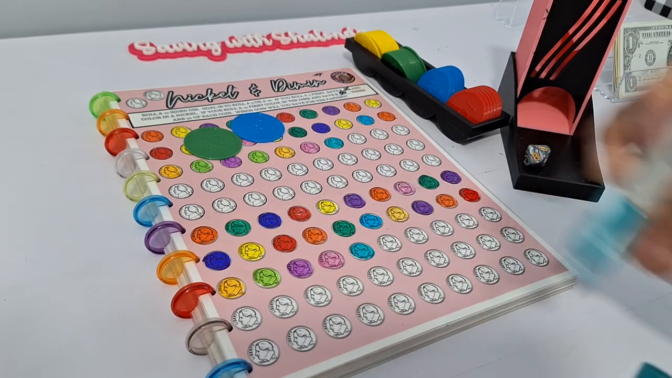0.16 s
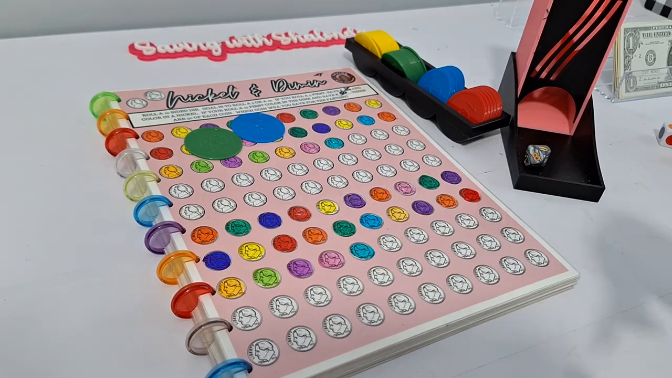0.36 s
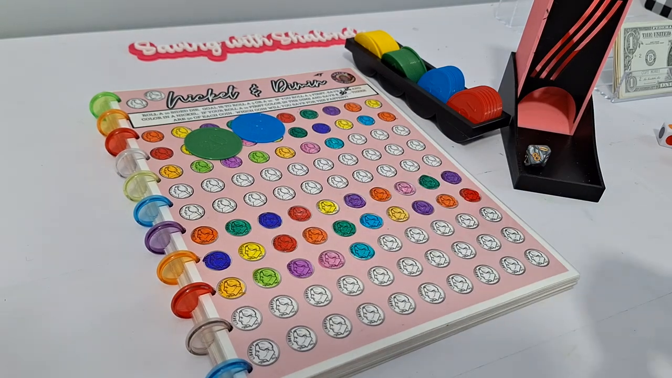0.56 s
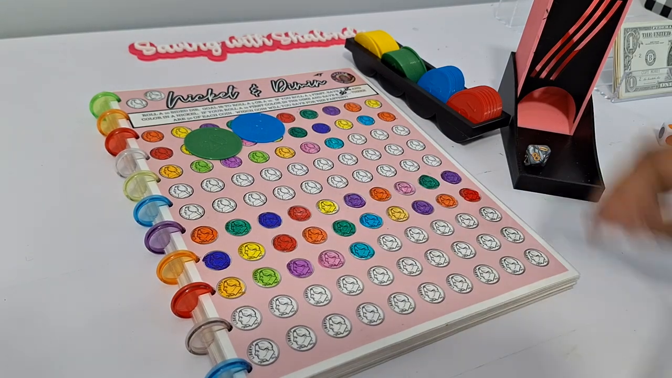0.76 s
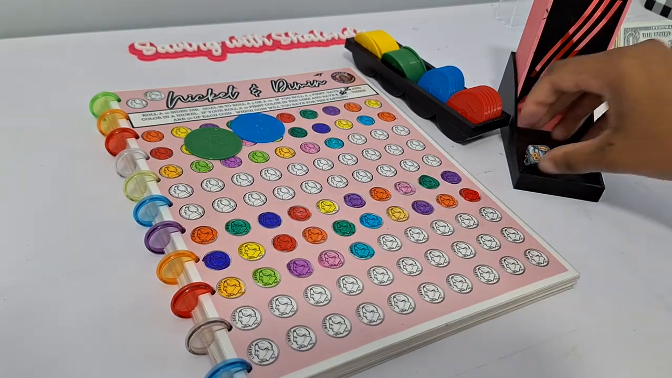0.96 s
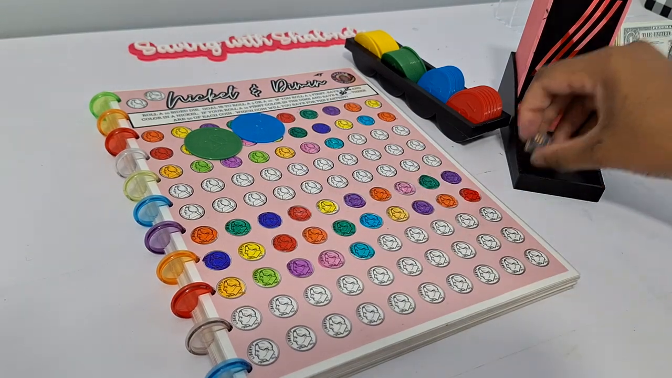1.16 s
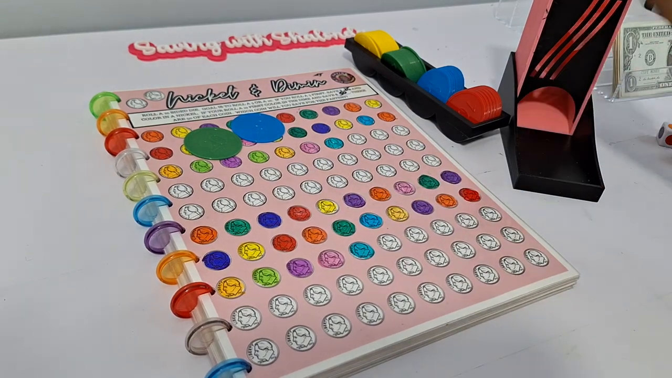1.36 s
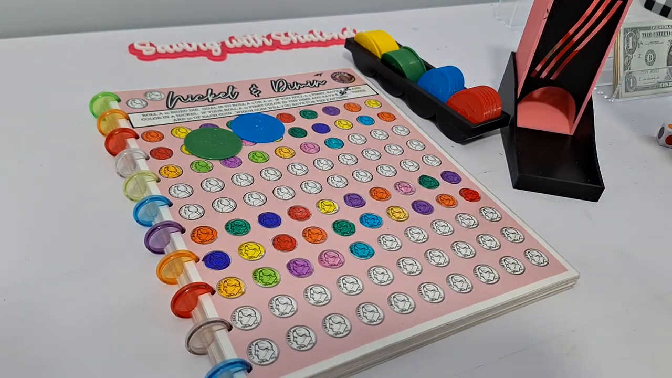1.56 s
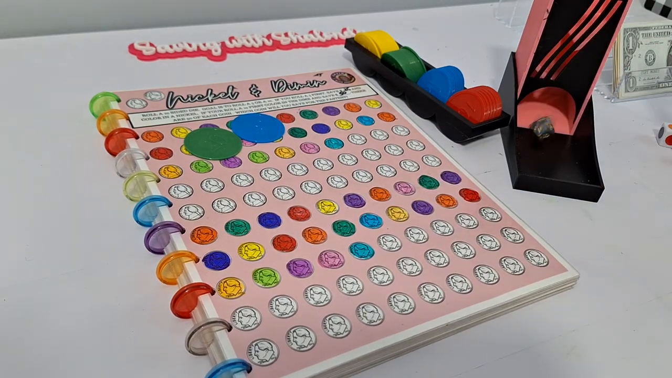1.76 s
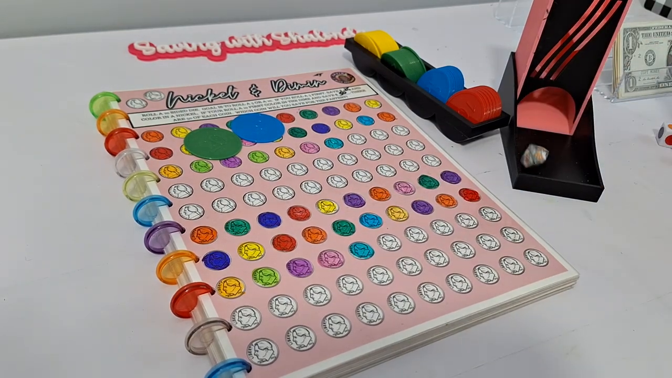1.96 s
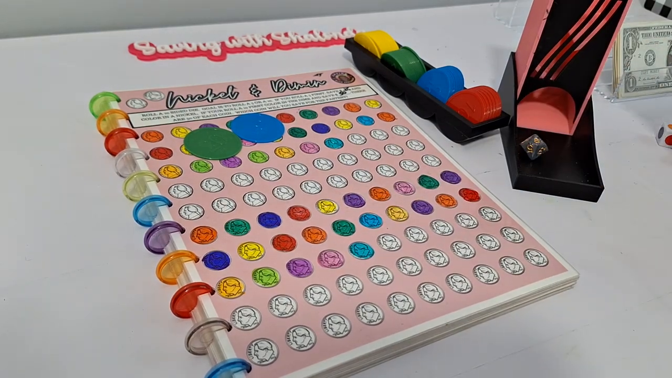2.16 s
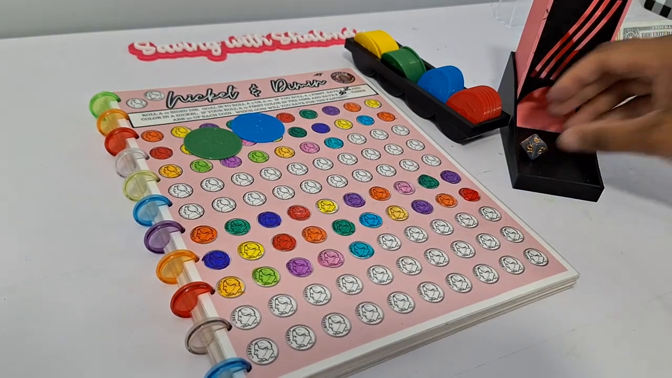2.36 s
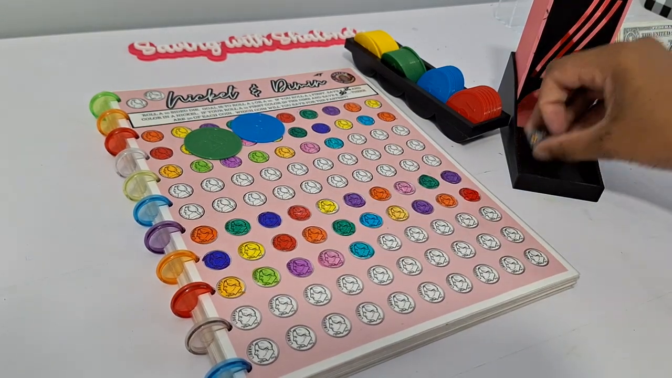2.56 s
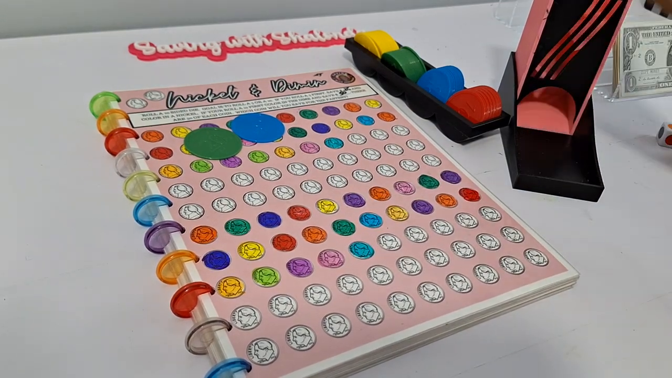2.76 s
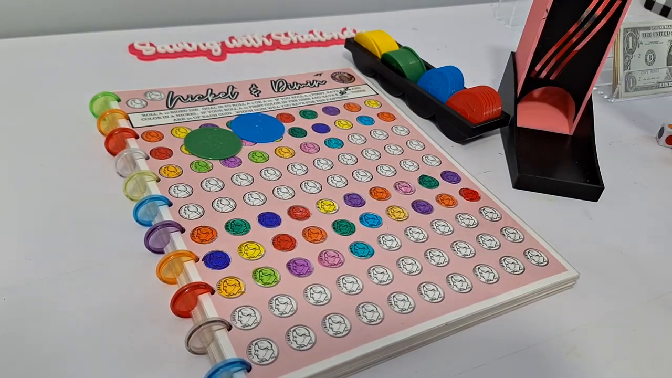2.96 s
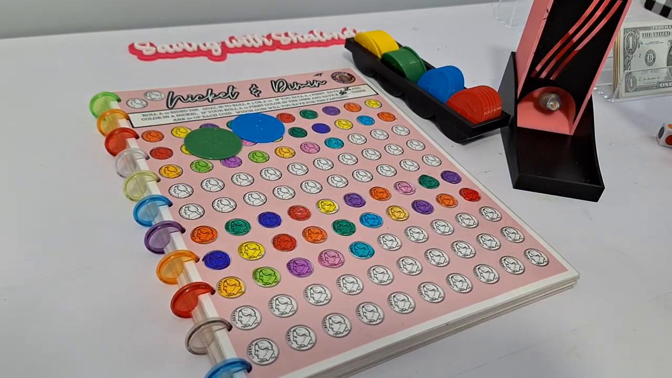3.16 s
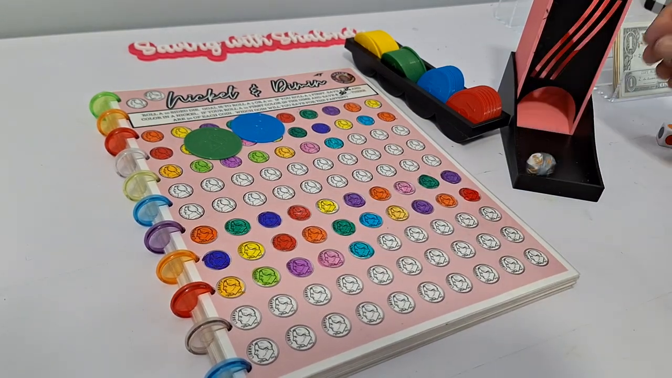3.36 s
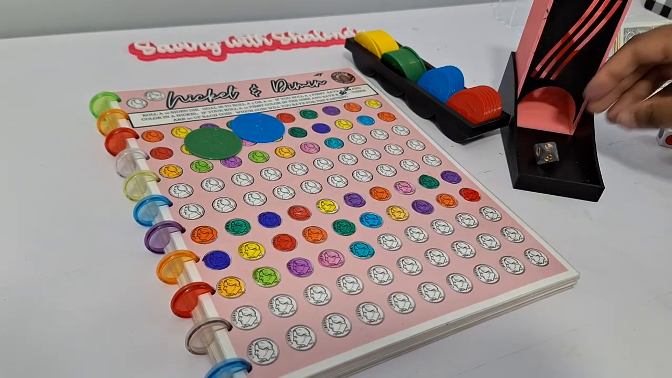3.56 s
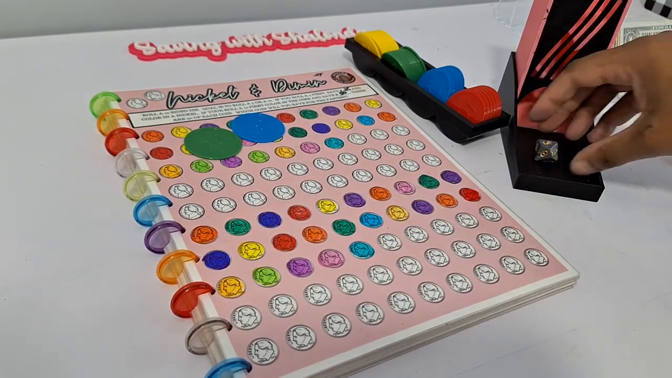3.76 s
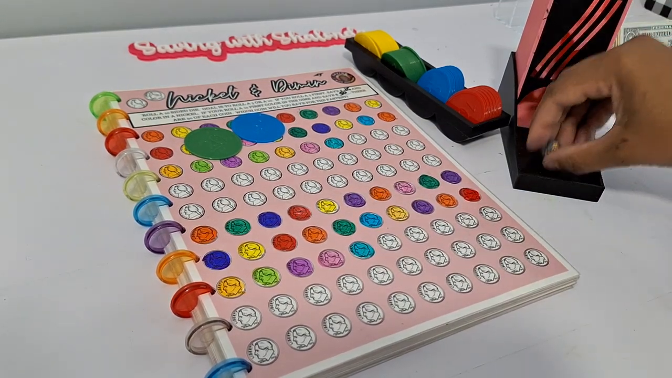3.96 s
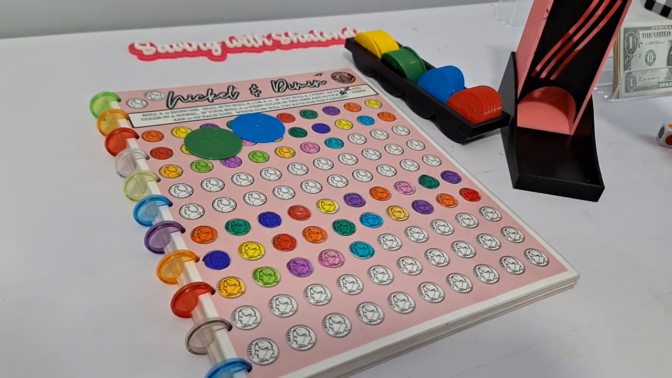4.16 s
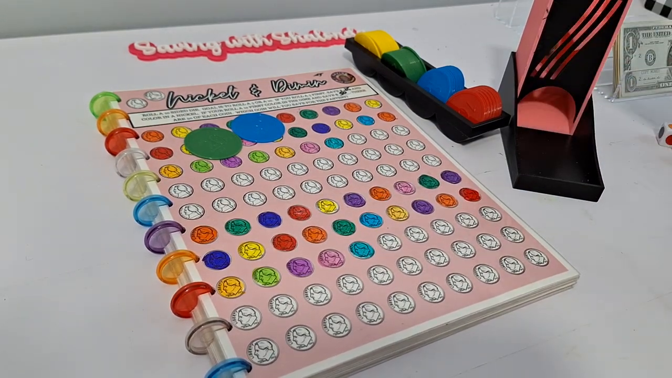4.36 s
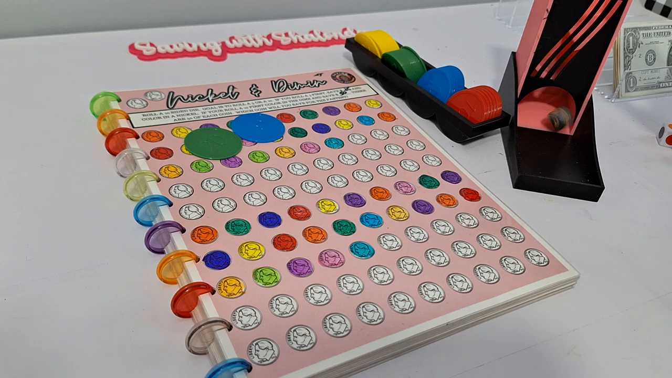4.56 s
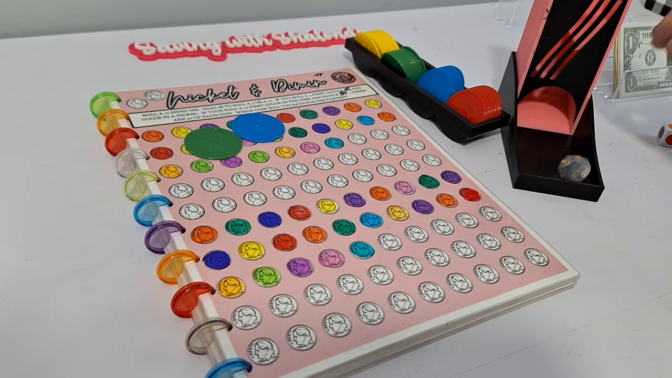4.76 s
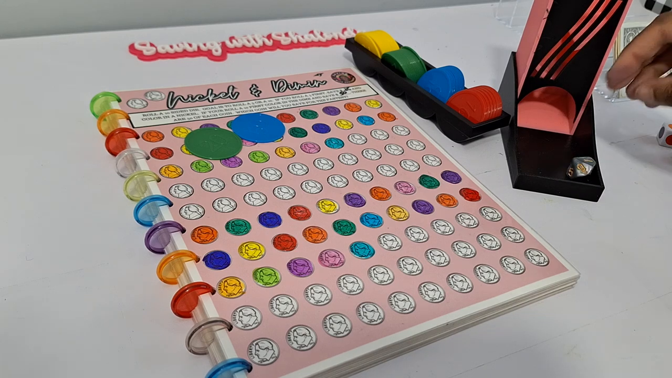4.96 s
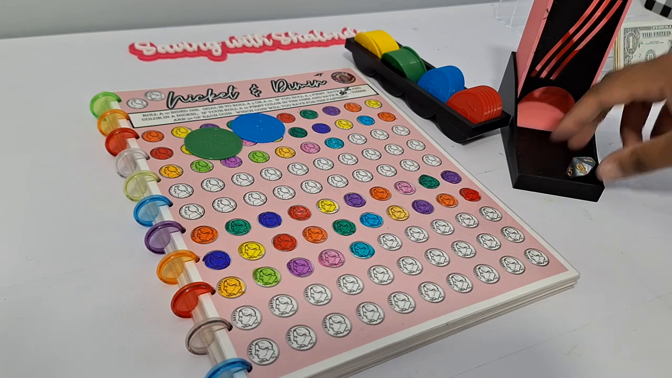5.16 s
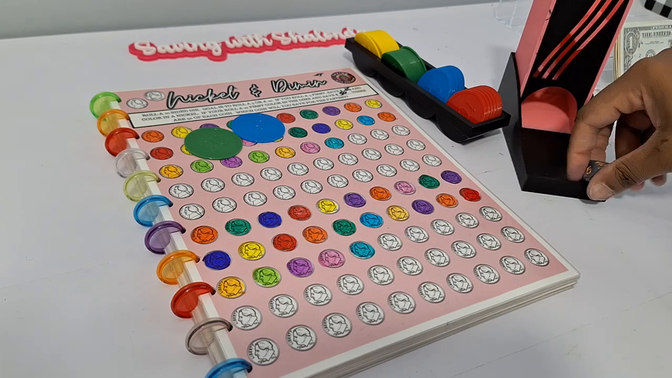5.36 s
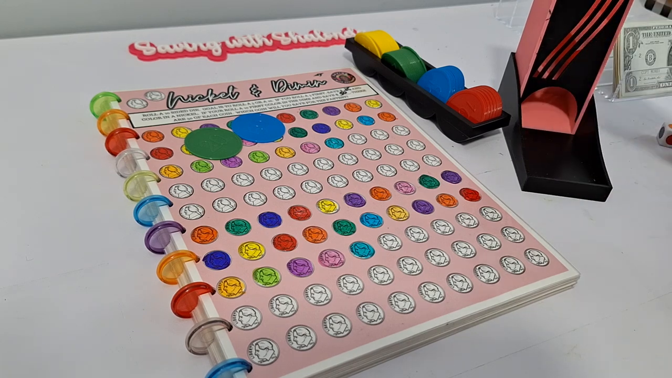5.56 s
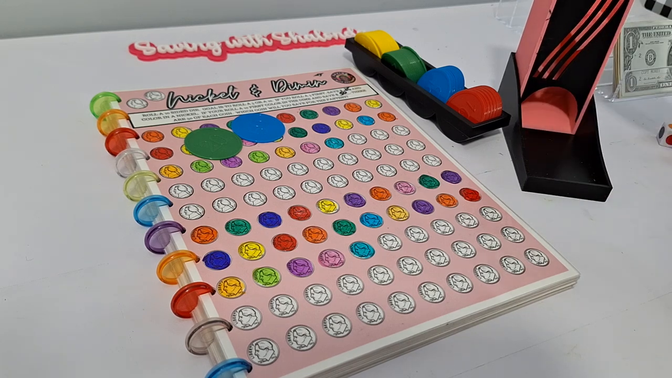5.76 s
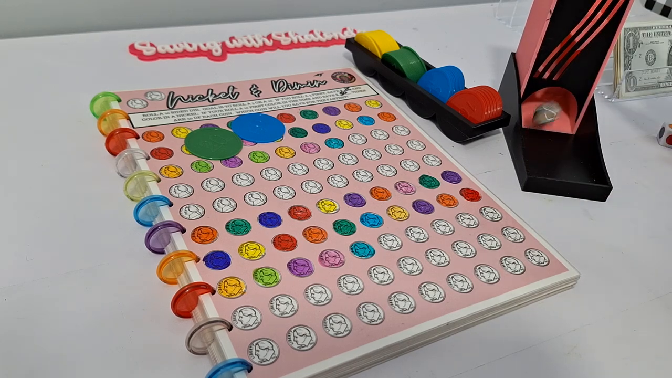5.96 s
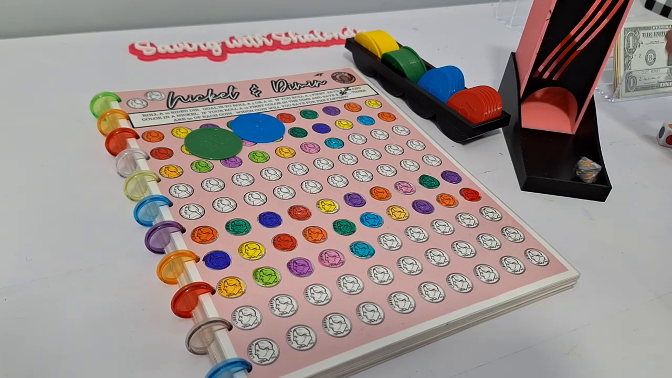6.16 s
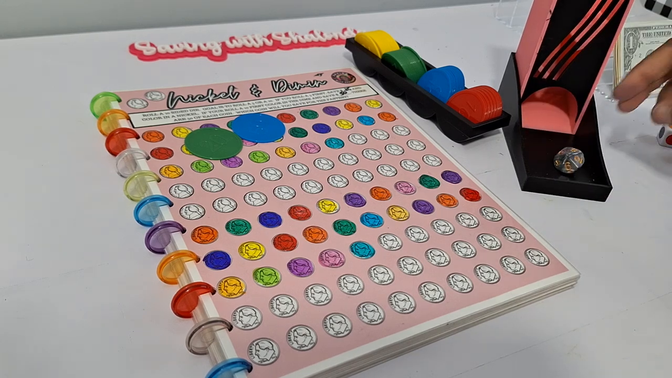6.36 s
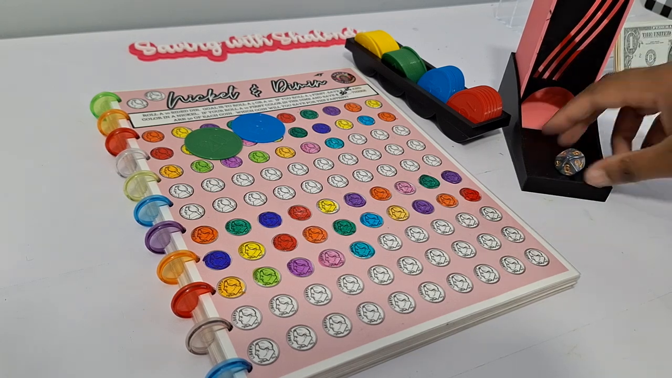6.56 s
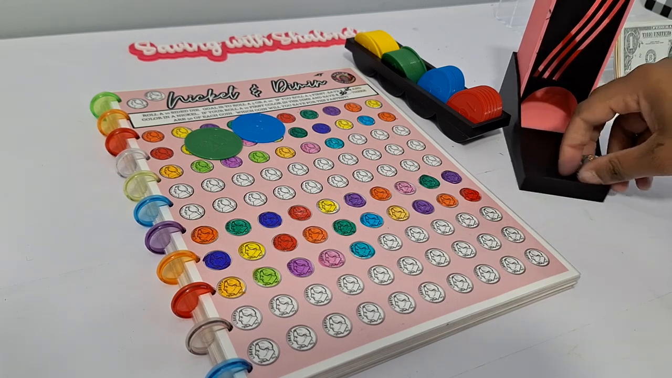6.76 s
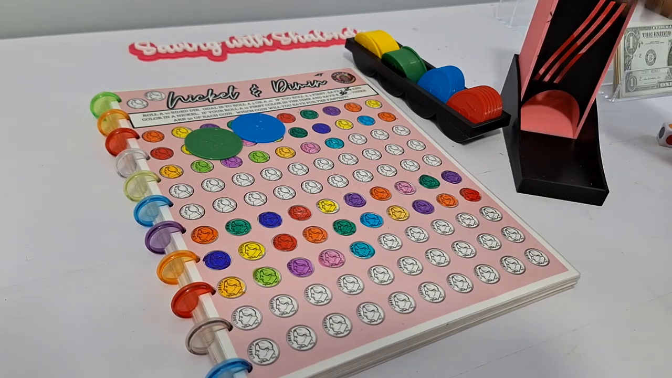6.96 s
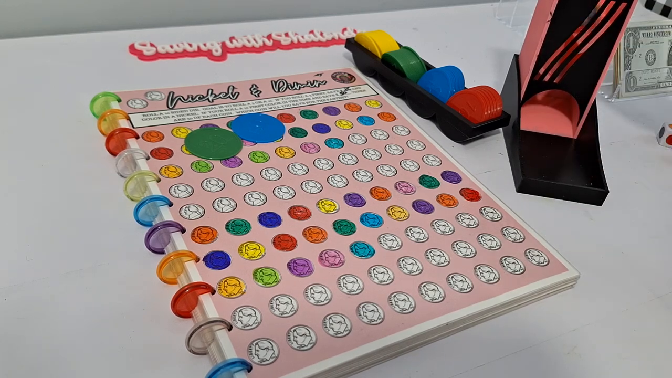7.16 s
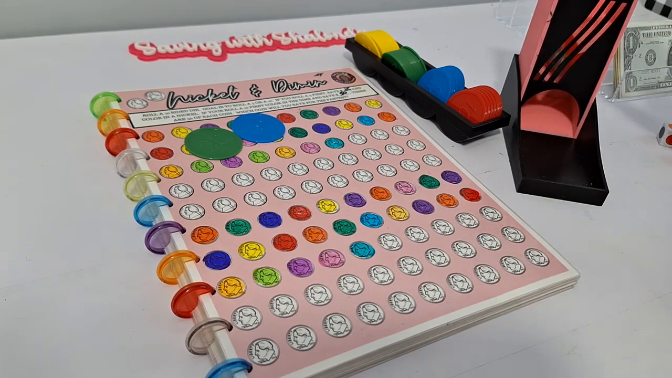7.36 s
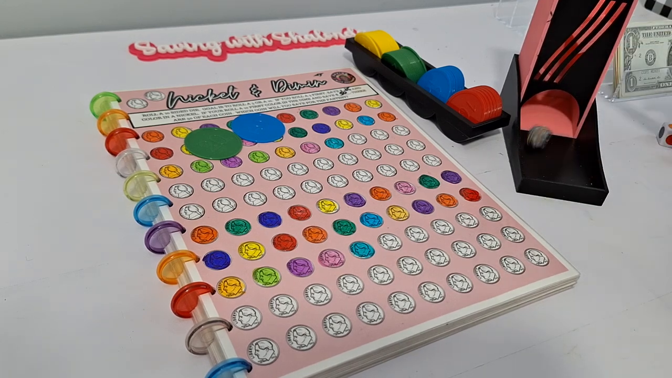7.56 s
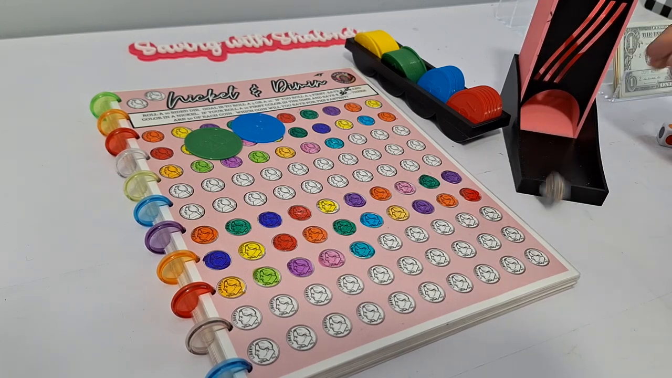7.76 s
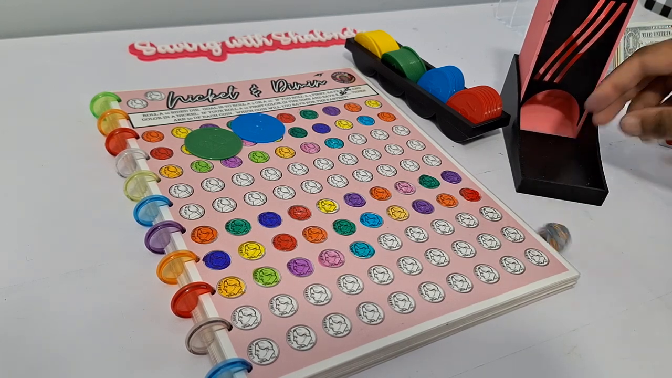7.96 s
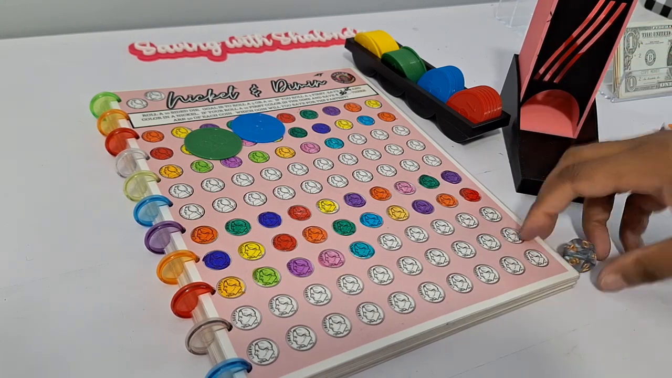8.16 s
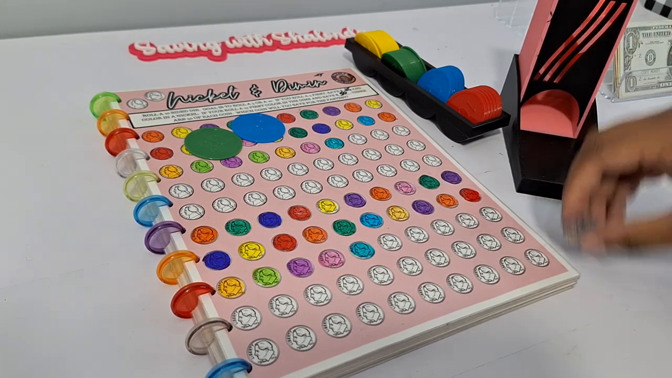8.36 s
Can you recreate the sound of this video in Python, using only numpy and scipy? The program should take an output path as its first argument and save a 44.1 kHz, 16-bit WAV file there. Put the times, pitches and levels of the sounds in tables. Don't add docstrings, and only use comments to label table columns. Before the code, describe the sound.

Brief paper rubbing and a pen set down, then five sharp rattling die drops through a plastic tower in a quiet, humming room.

```python
import sys
import numpy as np
from scipy import signal
from scipy.fft import rfft, irfft
from scipy.io import wavfile
from scipy.ndimage import uniform_filter1d

SR = 44100
rng = np.random.default_rng(int(sys.argv[2]) if len(sys.argv) > 2 else 0)


def volts_from_decibels(level):
    exponent = np.asarray(level, float) / 20
    return 10 ** exponent


def store_pcm(level_fs):
    pcm = np.round(np.clip(level_fs, -1, 1) * 32767).astype(np.int16)
    wavfile.write(sys.argv[1], SR, np.atleast_2d(pcm).T)


N = 370440

# pitch_hz, level_db (per Hz)
HUM_SPECTRUM = [(20, -34.5), (40, -23), (58, 8.5), (78, -17.5), (115, -8.5), (145, -3.5), (180, -17),
                (215, -11), (238, -18.5), (260, -9), (290, -17), (450, -28), (900, -48), (16000, -69.5)]
# pitch_hz, likeness (0 to 1)
HUM_LIKENESS = [(30, .85), (150, .95), (400, .8), (1000, 0.18), (4000, .1)]
# time_s, rumble_db, hiss_db
SETTLING = [
    (0, 4, 11),
    (1.398, 4, 5.5),
    (2.2, -2, 2),
    (3.002, 1, -0.5),
    (8.4, 0.5, 2),
]
HUM_DB = -50
SWELL_DB, SWELL_SLOW_HZ, SWELL_FAST_HZ = 2.5, 0.41, 1.7

# start_s, strongest_s, end_s, level_db, hiss_above_it_db
RUBS = [(0, 0.118, 0.38, -50, 3.5), (0.61, 0.68, 0.78, -57.5, 14.5), (0.96, 0.99, 1.2, -73.5, -7),
        (1.065, 1.092, 1.22, -54.5, -15), (2.446, 2.554, 2.59, -59, 0.5), (3.709, 3.786, 3.92, -67.5, -11),
        (3.905, 3.924, 4, -51, -19.5), (5.21, 5.237, 5.44, -63, 0), (5.311, 5.353, 5.45, -44, -8),
        (6.608, 6.642, 6.82, -53.5, 1), (6.76, 6.863, 6.94, -62.5, -2), (6.443, 6.51, 6.59, -64, -16),
        (0.43, 0.447, 0.46, -61, 6), (8.189, 8.252, 8.36, -58.5, -3)]
# pitch_hz, level_db
RUB_BODY = [(250, -11.5), (700, -1.5), (1800, -0.5), (4500, 2.0), (7000, -8.5)]
RUB_HISS = [(3500, -21.5), (6500, 1.5), (10000, -9), (15000, -3.5)]
RUB_START_DB, RUB_END_DB, RUB_GRAIN_DB = -24.5, -27.5, 2.5
DRAG_DB, DRAG_WIDTH_HZ = -6.5, 100

# pitch_hz, t60_s
ROOM_T60 = [(150, 0.72), (600, 0.28), (1800, 0.24), (5000, 0.19), (12000, 0.22)]
# pitch_hz, level_db
ROOM_LEVEL = [(150, 1), (1000, -8.5), (4000, -7), (12000, -10)]
# pitch_hz, likeness (0 to 1)
ROOM_LIKENESS = [(100, 0.85), (400, 0.68), (800, 0.12), (2000, 0.24)]
# delay_s, left_db, right_db
ECHOES = [
    (.0097, -19, -17),
    (0.014, -21.5, -21.5),
    (.027, -21, -22),
    (.034, -23, -22),
]

# pitch_hz, level_db, t60_s
TOWER_MODES = [(610, -7.5, 0.067), (997.7, 8, 0.13), (1190, 6.5, 0.082), (1600, -5.5, 0.1), (1763, 0, 0.1),
               (1830, -2, 0.11), (1942, 1, 0.15), (2290, -9, 0.15), (2320, -13, 0.09), (2660, 3, 0.11),
               (2760, 2.5, 0.079), (2840, 4, 0.11), (3280, -9.5, 0.046), (3610, -1.5, 0.11),
               (4260, 0.5, 0.15), (5030, 0, 0.12), (5370, -6.5, 0.13)]
# pitch_hz, level_db, t60_s
TRAY_MODES = [(600, -6, .05), (1054, 0, .05), (1190, 0, .045), (1390, 0, .045), (2056, -2, .03),
              (2420, 0, .04), (2590, 0, .045), (2750, -3, .05), (4200, -3, .03)]
# pitch_hz, level_db, t60_s
TABLE_MODES = [(570, 0, .04), (1077, -3, .04), (1276, 0, .04), (1500, 0, .04), (2164, -2, .03)]
# start_s, peak_db, loudest_ring_hz, edge_db
TABLE_HITS = [(.4294, -47, 1660, -7), (0.5794, -35.5, 1690, -7), (0.606, -32, 2500, 3),
              (0.633, -32, 6400, -7), (0.6377, -21, 2370, -0.5), (0.702, -38.5, 4920, -6),
              (7.837, -1.5, 1590, -45), (7.863, -18, 1490, -52), (7.896, -17, 1500, -50),
              (7.907, -21, 1260, -48), (7.967, -10.5, 1580, -40), (7.981, -21.5, 1480, -55),
              (8.01, -23, 1470, -33), (8.02, -23, 680, -34), (8.047, -15, 1660, -30),
              (8.059, -22, 1500, -42), (8.066, -21, 1100, -30), (7.850, -15.5, 1500, -57),
              (8.117, -22.5, 1520, -40), (8.124, -27.5, 2090, -53), (8.218, -43, 7440, 6),
              (8.25, -38, 595, -40), (8.287, -34, 1640, -31)]
# start_s, peak_db, loudest_ring_hz, edge_db
NUDGES = [(1.073, -46.5, 1170, -21), (1.088, -41.5, 1150, -29.5), (1.105, -23.5, 2750, -13.5),
          (1.108, -24.5, 3980, -22), (1.118, -35, 1410, -21), (1.328, -58, 6830, 4),
          (2.518, -42.5, 1132, -7), (3.828, -49, 1058, -20), (3.942, -19, 2570, -16.5),
          (5.345, -12, 1227, -9), (5.354, -12, 1197, -7.5), (5.392, -28, 1051, -17),
          (6.707, -27.5, 2040, -13.5), (6.712, -25, 1230, -17.5), (6.726, -29, 2410, -22),
          (6.741, -41, 2445, -26), (6.792, -40, 2400, -9), (6.819, -44.5, 746, -29)]
# start_s, peak_db, loudest_ring_hz, edge_db
DROP_1 = [(1.559, -2, 3780, -9.5), (1.570, 0, 1045, -8), (1.622, -3.5, 2660, -12), (1.633, -4.5, 1830, -6),
          (1.675, -9, 1590, -22), (1.691, -1.5, 2520, -19.5), (1.722, -4, 2300, -13),
          (1.736, -11.5, 1940, -22.5), (1.762, -11, 2683, -17), (1.767, -0.5, 2890, -18.5),
          (1.788, -27.5, 2640, -5), (1.826, -3, 2530, -17), (1.89, -10.5, 4200, -5), (1.894, -7, 2490, -17),
          (1.931, -3, 1350, -11.5), (1.986, -25.5, 1380, -18), (2.011, -8.5, 4340, -19),
          (2.052, -16, 2540, -16), (2.068, -16.5, 2390, -14), (2.093, -16, 2320, -22.5),
          (2.118, -32.5, 1160, -18), (2.271, -55, 1380, -24)]
DROP_2 = [(2.922, -12, 4250, -7.5), (2.927, -5.5, 4040, -17.5), (2.951, -1, 1980, -7),
          (2.982, -1.5, 953, -20.5), (3.002, -6.5, 1870, -13.5), (3.028, -8, 1770, -12.5),
          (3.072, -6.5, 1025, -18), (3.108, 0.5, 2660, -16), (3.139, -10, 2790, -17),
          (3.178, -4, 1030, -12), (3.21, -0.5, 2760, -17.5), (3.221, -11.5, 2760, -18),
          (3.309, -3.5, 2840, -12), (3.351, -12, 1400, -16), (3.384, -11, 1120, -16.5),
          (3.42, -12, 2770, -10), (3.462, -15.5, 1320, -18.5), (3.484, -15, 1120, -20),
          (3.506, -9, 1325, -17), (3.529, -13.5, 2450, -15), (3.556, -16.5, 2560, -13),
          (3.604, -20, 2360, -14), (3.644, -22, 2440, -22.5)]
DROP_3 = [(4.321, -12.5, 1820, -12.5), (4.332, 2.5, 4200, -13), (4.336, -9.5, 1710, -18),
          (4.347, 0, 1610, -15), (4.358, -19, 1880, -21), (4.417, -1, 4180, -11), (4.424, -4, 4700, -21.5),
          (4.447, -5, 1020, -20), (4.473, -7, 1740, -15.5), (4.537, -4.5, 1050, -18.5),
          (4.558, -2.5, 2760, -17), (4.612, -4.5, 2760, -10), (4.676, -3.5, 2630, -13.5),
          (4.728, -12.5, 4380, -23), (4.733, -6, 1255, -14.5), (4.754, -7, 4360, 1),
          (4.77, -11.5, 1130, -17.5), (4.831, -6.5, 4300, -24), (4.831, -8.5, 1280, -14),
          (4.861, -12.5, 1190, -13.5), (4.896, -14, 1135, -14), (4.973, -28.5, 2090, -18),
          (5.004, -34, 1140, -24)]
DROP_4 = [(5.793, 1.5, 1740, -11.5), (5.797, -5, 4220, -25), (5.806, -6.5, 1190, -13),
          (5.842, -5.5, 2650, -15), (5.855, -4, 2660, -15), (5.901, -1.5, 5070, -10.5),
          (5.949, -0.5, 2800, -18.5), (6.057, -3.5, 1190, -17), (6.076, -3.5, 1420, -3),
          (6.114, -3.5, 2150, -15), (6.153, -18, 1270, -24), (6.168, -13.5, 4500, -11.5),
          (6.175, -10.5, 1340, -16), (6.204, -17.5, 1190, -18), (6.234, -10.5, 3070, -12),
          (6.239, -17, 3000, -13), (6.283, -15.5, 2140, -15.5), (6.308, -20.5, 2260, -15),
          (6.35, -24, 2300, -18.5), (6.453, -38.5, 2400, -26.5)]
DROP_5 = [(7.192, -8.5, 1830, -12), (7.206, 0, 4400, -13.5), (7.216, -1.5, 1770, -16),
          (7.244, -0.5, 1550, -16), (7.278, -9.5, 1035, -11.5), (7.295, -6, 1630, -15.5),
          (7.364, -2, 2745, -14.5), (7.423, -9.5, 1203, -26), (7.474, -4, 1050, -21),
          (7.508, -14.5, 2930, -8), (7.514, -3, 2730, -15), (7.617, -7, 1480, -9),
          (7.661, -10.5, 1380, -16.5), (7.716, -4, 1200, -18), (7.735, -12.5, 1045, -18),
          (7.787, -41, 1330, -29)]
IN_TOWER_S = [.25, .34, .33, .2, .38]
# start_s, peak_db, loudest_ring_hz, edge_db
GLANCES = [(1.695, -9, 2750, -17.5), (1.574, -7.5, 4260, -21.5), (1.724, -12.5, 1016, -17.5),
           (2.928, -5.5, 1194, -17.5), (2.954, -4, 5100, -16.5), (2.960, -8, 2290, -20.5),
           (3.008, -10, 2840, -18), (3.117, -7.5, 2660, -20.5), (3.182, -4.5, 2720, -19),
           (3.232, -18.5, 2760, -24), (4.326, -7.5, 3680, -16), (4.340, -8, 1810, -17.5),
           (4.364, -10.5, 1500, -20.5), (4.478, -13.5, 2980, -22), (4.539, -18.5, 3875, -24),
           (5.820, -10.5, 1778, -12.5), (5.857, -8.5, 4260, -12), (5.903, -7.5, 1756, -21.5),
           (7.189, -17, 3600, -14), (7.197, -11, 1870, -17), (7.292, -16, 1820, -18),
           (7.301, -11, 4800, -23), (7.366, -4, 4260, -17.5), (7.431, -10.5, 1960, -15.5),
           (7.517, -8, 4260, -34)]
# start_s, peak_db, loudest_ring_hz, edge_db
RATTLES = [(1.682, -12.5, 1810, -19.5), (1.755, -17, 2190, -18.5), (1.955, -18, 1100, -19.5),
           (3.398, -13.5, 4100, -14), (3.478, -23, 1070, -22), (3.573, -21, 2490, -24),
           (3.581, -23, 2400, -28), (3.949, -24, 2510, -19), (4.769, -11, 1160, -18),
           (5.85, -10.5, 2670, -19.5), (5.925, -14, 2630, -20), (7.632, -18.5, 1430, -19.5),
           (7.636, -15.5, 2640, -26), (7.786, -29, 1160, -21), (7.907, -39, 1260, -23)]
THUD_PER_OCTAVE_DB, THUD_PER_EDGE = -1.5, 0.22
LUMPY_DB = 2.5
PORT_LUMPY_DB, PORT_LAG_MS = 4., .035

# start_s, table_db, hollow_db
THUMPS = [(1.57, -26.5, -22.5), (1.624, -38.5, -34.5), (1.676, -42.5, -36.5), (1.722, -45, -31.5),
          (1.765, -45, -33.5), (1.826, -39, -34), (1.892, -40, -37.5), (1.931, -40, -36.5),
          (2.927, -32.5, -39), (2.951, -40, -25), (2.982, -38.5, -30.5), (3.003, -40, -29.5),
          (3.028, -41.5, -35.5), (3.072, -44.5, -33.5), (3.178, -46.5, -28), (3.21, -30.5, -29),
          (3.309, -35, -39.5), (4.332, -30, -24.5), (4.347, -36.5, -26.5), (4.417, -33, -32),
          (4.447, -33, -35), (4.473, -37, -34), (4.537, -42, -28.5), (4.558, -32.5, -26.5),
          (4.612, -37.5, -33), (4.676, -37.5, -30), (4.733, -38, -27.5), (4.77, -39, -33),
          (4.831, -35.5, -29), (5.795, -33.5, -32.5), (5.842, -37.5, -39), (5.901, -48.5, -34),
          (5.949, -37.5, -37), (6.057, -36, -31), (6.076, -47, -39), (7.192, -37.5, -35),
          (7.206, -37.5, -34), (7.244, -36, -29.5), (7.295, -46, -31), (7.364, -32, -25.5),
          (7.423, -41, -30.5), (7.474, -50, -24), (7.515, -34, -34), (7.716, -31, -26.5),
          (7.837, -38.5, -26), (7.896, -42, -30.5), (7.967, -48, -34)]
# pitch_hz, level_db, t60_s
HOLLOW_MODES = [(621, 0, 0.055), (653, -7.5, 0.022)]
# pitch_hz, level_db, t60_s
BOOM_MODES = [(133.6, 2.5, 0.18), (199, -1, 0.088), (367, 5, 0.076)]
# start_s, level_db
PALM = (8.224, -40.5)
HOLLOW_RISE_S, BOOM_RISE_S = 0.00082, 0.0035

# start_s, strongest_s, end_s, level_db
SCUFFS = [
    (6.62, 6.68, 6.72, -52.5),
    (6.774, 6.813, 6.92, -57),
    (8.239, 8.254, 8.285, -53),
    (8.28, 8.295, 8.34, -56),
]
# pitch_hz, level_db
SCUFF_SPECTRUM = [(200, -14.5), (400, -1.5), (600, 0), (800, -6), (1100, -3.5), (2500, -19), (4000, -39)]
SCUFF_GRAIN_DB = 3

# pitch_hz, level_db
SHADOW = [(300, 0), (700, 2), (1300, 0), (2500, -2), (6000, -4.5), (14000, -7)]
# pitch_hz, lag_ms
LEFT_LAG = [(1200, 0.2), (3300, 0.087), (8000, 0.094)]
EDGE_HZ, LOW_CUT_HZ = 16050, 53


def evened(x):
    return x / np.sqrt(np.mean(x ** 2) + 1e-20)


def read(points, hz):
    f, value = np.transpose(points)
    return np.interp(np.log(hz + 1), np.log(f + 1), value)


def add(mix, s, sound):
    part = mix[round(s * SR):][:len(sound)]
    part += sound[:len(part)]


def colour(x, points, lag_s=0.):
    hz = np.fft.rfftfreq(x.shape[-1], 1 / SR)
    delay = np.exp(-2j * np.pi * hz * lag_s)
    return irfft(rfft(x) * volts_from_decibels(read(points, hz)) * delay, x.shape[-1])


def lumpy(x, width):
    return evened(uniform_filter1d(uniform_filter1d(x, width), width))


def grainy(depth_db, width):
    return volts_from_decibels(depth_db * evened(uniform_filter1d(rng.standard_normal(N), width)))


def stroke(s, level_db, start_db, end_db, fade_s):
    at = np.arange(round(s[0] * SR), min(round(s[-1] * SR), N))
    on = np.clip(np.minimum(at / SR - s[0], s[-1] - at / SR) / fade_s, 0, 1)
    return at, on * volts_from_decibels(level_db + np.interp(at / SR, s, [start_db, 0, end_db]))


def hum():
    frames, hz = N // 1024 + 5, np.fft.rfftfreq(4096, 1 / SR)
    a, b, c, d, lumps = rng.standard_normal((frames, 2049, 5)).T
    lumps = evened(uniform_filter1d(uniform_filter1d(lumps, 6, 0), 6, 1))
    same = np.clip(read(HUM_LIKENESS, hz), -1, 1)[:, None]
    left = a + 1j * b
    z = np.array([left, same * left + np.sqrt(1 - same ** 2) * (c + 1j * d)])

    s, rumble_db, hiss_db = np.transpose(SETTLING)
    t = np.arange(frames) * 1024 / SR
    settle_db = np.where(hz[:, None] < 700, np.interp(t, s, rumble_db), np.interp(t, s, hiss_db))
    rates = np.geomspace(SWELL_SLOW_HZ, SWELL_FAST_HZ, 12)[:, None]
    swell = evened(np.sin(2 * np.pi * (rates * t + rng.random((12, 1)))).sum(0))
    settle_db += SWELL_DB * (hz[:, None] < 75) * swell
    lean_db = 1.3 * np.exp(-hz / 80)[:, None] * np.array([1, -1])[:, None, None]
    z *= volts_from_decibels(read(HUM_SPECTRUM, hz)[:, None] + 0.3 * lumps + settle_db + lean_db)
    sound = signal.istft(z, nperseg=4096, noverlap=3072)[1]
    return volts_from_decibels(HUM_DB) * evened(sound[:, :N])


def rubs():
    out = np.zeros(N)
    noise = rng.standard_normal((2, N)) * grainy(RUB_GRAIN_DB, 60)
    body = evened(colour(noise[0], RUB_BODY))
    hiss = evened(colour(noise[1], RUB_HISS))
    hz = np.fft.rfftfreq(N, 1 / SR)
    peaks = sum(volts_from_decibels(db) / (1 + ((hz - f) / DRAG_WIDTH_HZ) ** 2) for f, db, _ in TRAY_MODES)
    drag = evened(irfft(rfft(noise[0]) * peaks, N))
    for *s, level_db, hiss_db in RUBS:
        at, press = stroke(s, level_db - 5.0, RUB_START_DB, RUB_END_DB, fade_s=0.022)
        out[at] += press * (body[at] + hiss[at] * volts_from_decibels(hiss_db) + drag[at] * volts_from_decibels(DRAG_DB - hiss_db))
    return out


def room(x):
    out, t = np.zeros((2, N)), np.arange(N) / SR
    for k in range(3):
        taps = np.zeros((2, SR // 2))
        at = np.arange(130, SR // 2 - 16, 16) + rng.integers(0, 16, (2, (SR // 2 - 131) // 16))
        np.put_along_axis(taps, at, rng.choice([-1., 1.], at.shape), 1)
        hz, u, z = signal.stft(taps, SR, nperseg=256)
        same = np.clip(read(ROOM_LIKENESS, hz), 0, 1)[:, None]
        t60 = read(ROOM_T60, hz)[:, None]
        z[1] = same * z[0] + np.sqrt(1 - same ** 2) * z[1]
        decay = volts_from_decibels(-60 * u / t60 + read(ROOM_LEVEL, hz)[:, None]) / np.sqrt(t60)
        tail = signal.istft(z * decay, SR, nperseg=256)[1]
        tail *= 0.09 * volts_from_decibels([[.6], [-.6]])
        turn = np.sqrt(2 / 3) * np.cos(np.pi * (11.3 * t + k / 3))
        out += signal.oaconvolve((x * turn)[None], tail, axes=1)[:, :N]
    return out


def echoes(x):
    taps, t = np.zeros((2, SR // 20)), np.arange(88) / SR
    for s, *dbs in ECHOES:
        smears = rng.standard_normal((2, 88)) * np.exp(-t / .0006)
        for port, db, smear in zip(taps, dbs, smears):
            add(port, s, volts_from_decibels(db) * smear / np.linalg.norm(smear))
    return signal.fftconvolve(x[None], taps, axes=1)[:, :N]


def knock(row, modes, chance, crack_s, ring_db, favour, knee_hz, own_db, tick):
    s, peak_db, ring_hz, thud_db, edge_db = row
    t, hz = np.arange(len(chance)) / SR, np.fft.rfftfreq(len(chance), 1 / SR)

    f, db, t60 = np.tile(np.transpose(modes), 2)[:, :, None]
    luck = chance[-2 * len(f):].reshape(2, -1, 1)
    f = f * (1 + .015 * luck[0])
    share = volts_from_decibels(db + 5 * luck[1] - favour * abs(np.log2(f / ring_hz)))
    body = (share / (np.log(1000) / t60 + 2j * np.pi * (hz - f)).astype(np.complex64)).sum(0)
    own = 1 / (np.log(1000) * ring_hz / 32 + 2j * np.pi * (hz - ring_hz))

    crack = chance * np.exp(-t / crack_s) * (1 - np.exp(-t / 0.0011))
    crack[8] += tick * np.linalg.norm(crack)
    even = irfft(rfft(crack) / abs(rfft(crack)) ** .55)
    crack = evened(even * np.exp(-t / (3 * crack_s)))

    response = volts_from_decibels(LUMPY_DB * lumpy(chance[:len(hz)], len(hz) // 40))
    response = response + volts_from_decibels(ring_db) * body / np.sqrt(np.mean(abs(body) ** 2))
    response = response + volts_from_decibels(own_db) * own / abs(own).max()
    tilt = [(110, thud_db - 14.5), (250, thud_db), (700, thud_db + 4.5), (1500, 0), (knee_hz, 0),
            (knee_hz + 2430, edge_db + 10.5), (11500, edge_db + 1.0), (15000, edge_db - .8)]
    sound = colour(np.roll(irfft(rfft(crack) * response), 64), tilt)
    sound = sound * np.clip((t * SR - 52) / 20, 0, 1)

    beam = evened(uniform_filter1d(chance[len(hz) - 1::-1], len(hz) // 30))
    beam_db = (PORT_LUMPY_DB * beam - 2) * hz / (hz + 2000)
    lag = np.exp(-2j * np.pi * hz * PORT_LAG_MS / 1000 * chance[-1])
    left = irfft(rfft(sound) * volts_from_decibels(beam_db) * lag)
    left *= np.clip((t * SR - 44) / 20, 0, 1)
    return s - 52 / SR, volts_from_decibels(peak_db) * np.array([left, sound]).T / abs(sound).max()


def knocks(rows, modes, size, thud_db, **body):
    out = np.zeros((N, 2))
    for (s, db, hz, edge_db), chance in zip(rows, rng.standard_normal((len(rows), size))):
        low_db = thud_db + THUD_PER_OCTAVE_DB * np.log2(hz / 2000) + THUD_PER_EDGE * edge_db
        add(out, *knock((s, db, hz, low_db, edge_db), modes, chance, **body))
    return out.T


def thumps(rows, modes, rise_s, axis):
    hz, db, t60 = np.transpose(modes)[:, :, None]
    t, rows, force = np.arange(SR // 5) / SR, np.array(rows), np.zeros(N)
    force[(rows[:, 0] * SR).astype(int)] = volts_from_decibels(rows[:, axis])
    ring = (volts_from_decibels(db - 60 * t / t60) * np.sin(2 * np.pi * hz * t)).sum(0)
    ring = ring * (1 - np.exp(-t / rise_s))
    return signal.oaconvolve(force, ring)[:N]


def scuffs():
    noise = rng.standard_normal(N) * grainy(SCUFF_GRAIN_DB, 200)
    noise, out = evened(colour(noise, SCUFF_SPECTRUM)), np.zeros(N)
    for *s, level_db in SCUFFS:
        at, press = stroke(s, level_db, start_db=-16.5, end_db=-4.5, fade_s=.01)
        out[at] += press * noise[at]
    return out


def scene():
    drops = list(zip([DROP_1, DROP_2, DROP_3, DROP_4, DROP_5], IN_TOWER_S))
    baffles = [row for drop, s in drops for row in drop if row[0] < drop[0][0] + s]
    bounces = [row for drop, s in drops for row in drop if row[0] >= drop[0][0] + s]
    pen, roll = TABLE_HITS[:6], TABLE_HITS[6:]

    hits = knocks(pen, TABLE_MODES, size=4096, thud_db=-7.0, crack_s=0.0011, ring_db=-20.0,
                  favour=3.7, knee_hz=3420, own_db=15, tick=0.46)
    hits += knocks(NUDGES, TRAY_MODES, size=4096, thud_db=-6.0, crack_s=0.0017, ring_db=-8,
                   favour=4, knee_hz=4790, own_db=15, tick=.03)
    hits += knocks(baffles, TOWER_MODES, size=8192, thud_db=-10.5, crack_s=0.0029, ring_db=-9.5,
                   favour=1.1, knee_hz=4800, own_db=11.5, tick=0.022)
    hits += knocks(GLANCES, TOWER_MODES, size=4096, thud_db=-11.5, crack_s=0.0023, ring_db=-12.0,
                   favour=2.5, knee_hz=4800, own_db=15.5, tick=0.076)
    hits += knocks(RATTLES, TRAY_MODES, size=2048, thud_db=-10.5, crack_s=0.0013, ring_db=-11,
                   favour=4, knee_hz=4500, own_db=12.5, tick=.08)
    hits += knocks(bounces, TRAY_MODES, size=4096, thud_db=-6.5, crack_s=0.0018, ring_db=-12.5,
                   favour=2.0, knee_hz=4520, own_db=9.0, tick=0.19)
    hits += knocks(roll, TABLE_MODES, size=4096, thud_db=0, crack_s=0.0012, ring_db=-22,
                   favour=1.6, knee_hz=2600, own_db=-15, tick=0.8)

    hollow = thumps(THUMPS, HOLLOW_MODES, HOLLOW_RISE_S, axis=2)
    near_left, near_right = hits + hollow + rubs() + scuffs()
    far_left, far_right = echoes(near_right) + room(near_right)
    lag_s = read(LEFT_LAG, np.fft.rfftfreq(N, 1 / SR)) / 1000
    left = colour(near_left, SHADOW, lag_s) + colour(far_left, SHADOW)
    ports = volts_from_decibels(1.5) * np.array([left, near_right + far_right])
    boom = thumps(THUMPS, BOOM_MODES, BOOM_RISE_S, axis=1)
    palm = thumps([PALM], BOOM_MODES[:1], BOOM_RISE_S, axis=1)
    return ports + boom + palm + hum()


def roll_off(x):
    return signal.sosfilt(signal.butter(12, 16980, fs=SR, output="sos"), x)


def record(dry):
    low_cut = signal.butter(4, LOW_CUT_HZ, "high", fs=SR, output="sos")
    mix = np.tanh(signal.sosfilt(low_cut, dry))
    band_limit = signal.firwin(255, EDGE_HZ, window=("kaiser", 9), fs=SR)
    mix = signal.oaconvolve(mix, band_limit[None], "same")
    return roll_off(mix)


dry = scene()
out = record(dry)
store_pcm(out)
```